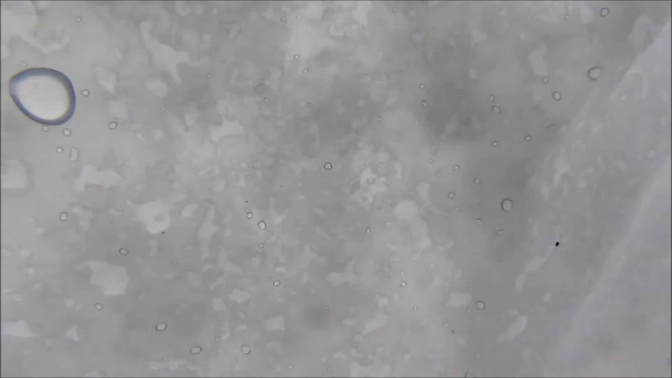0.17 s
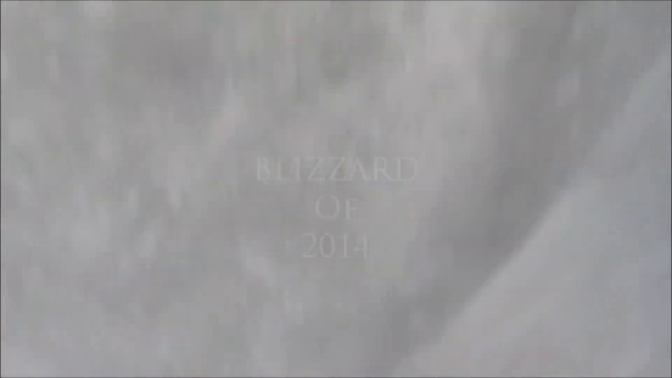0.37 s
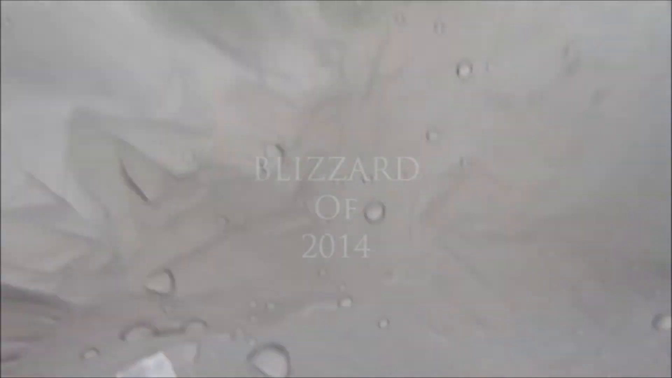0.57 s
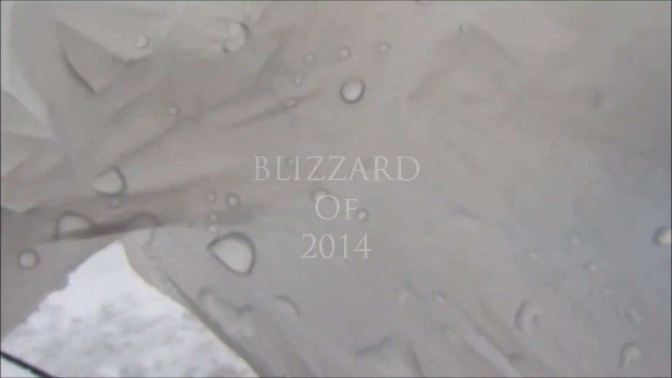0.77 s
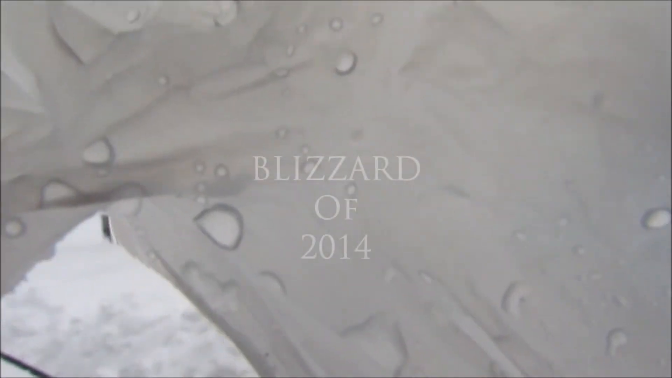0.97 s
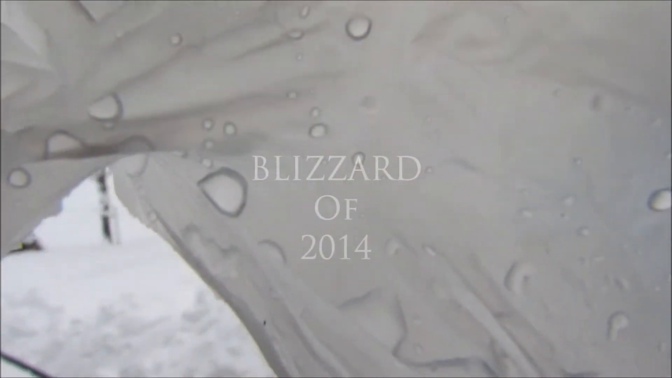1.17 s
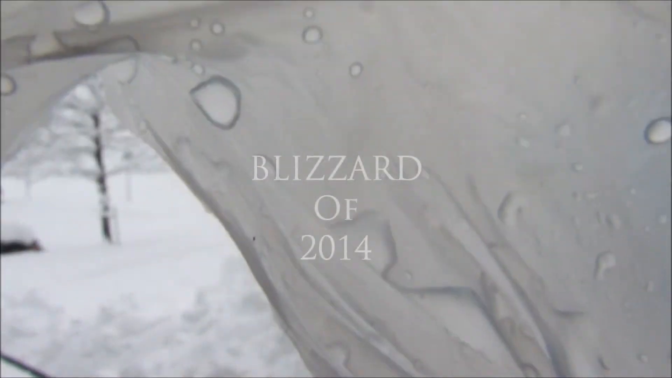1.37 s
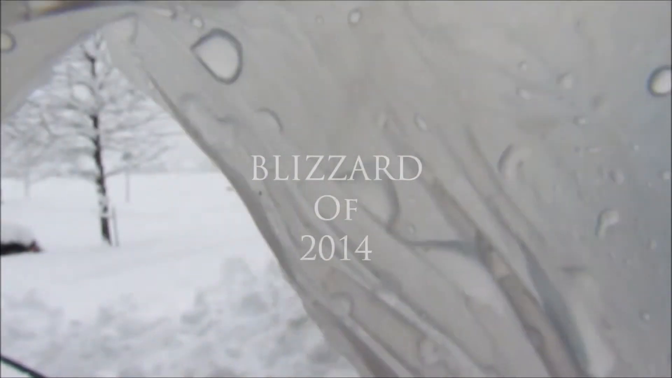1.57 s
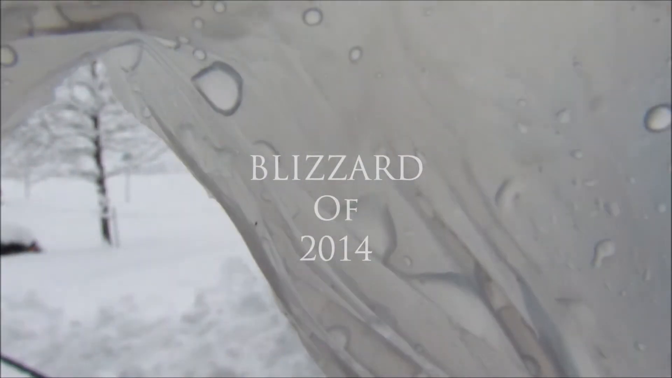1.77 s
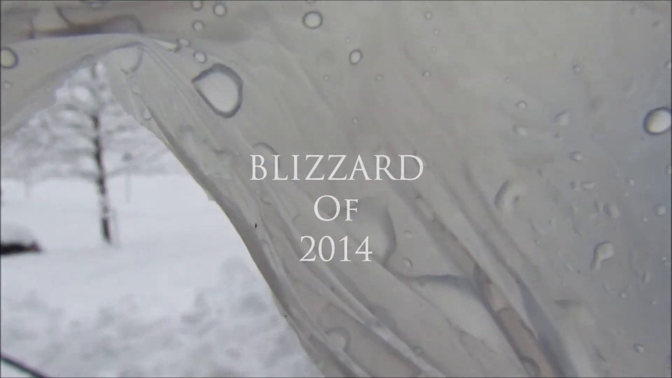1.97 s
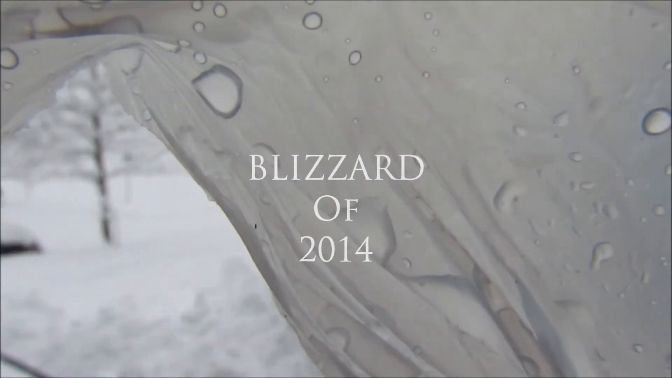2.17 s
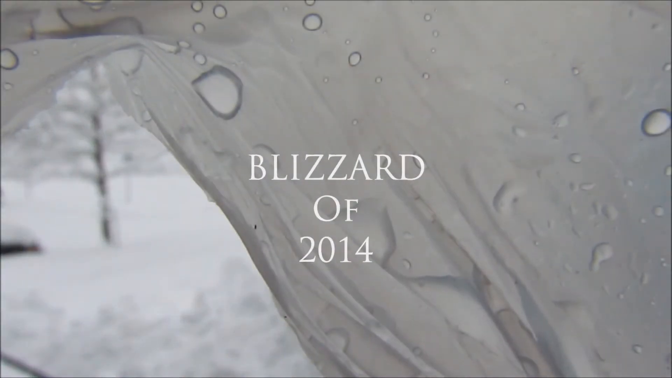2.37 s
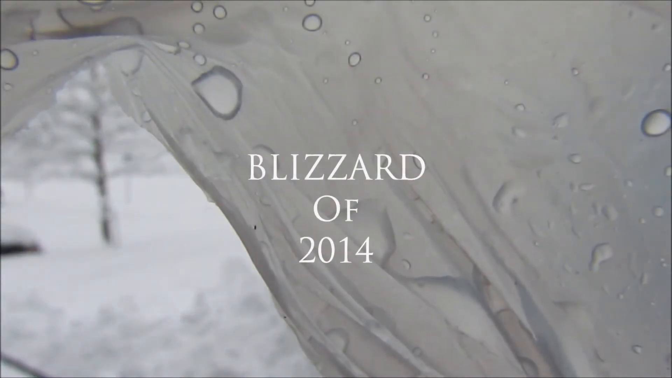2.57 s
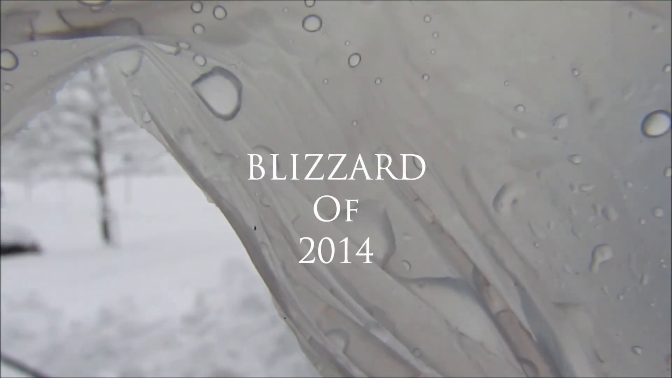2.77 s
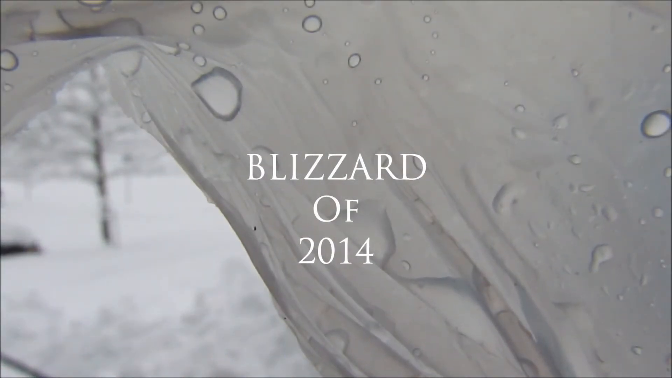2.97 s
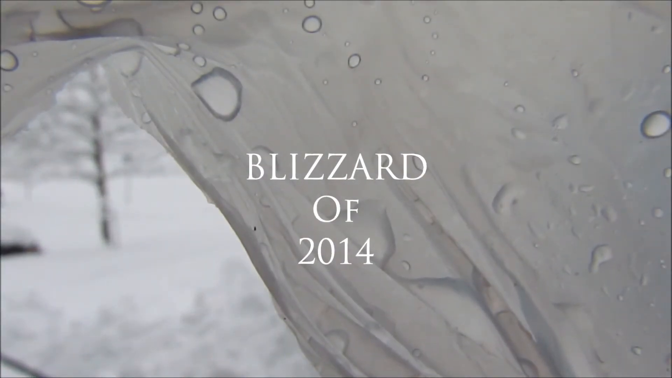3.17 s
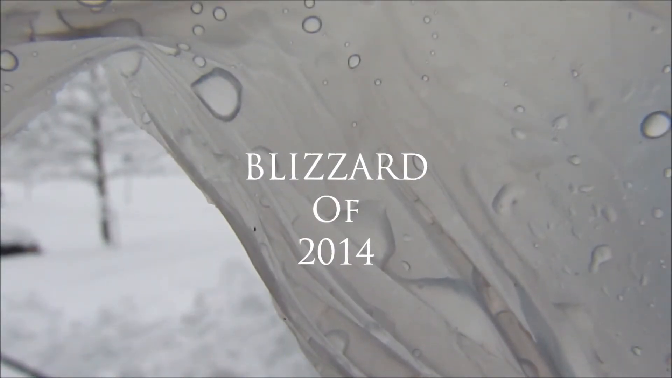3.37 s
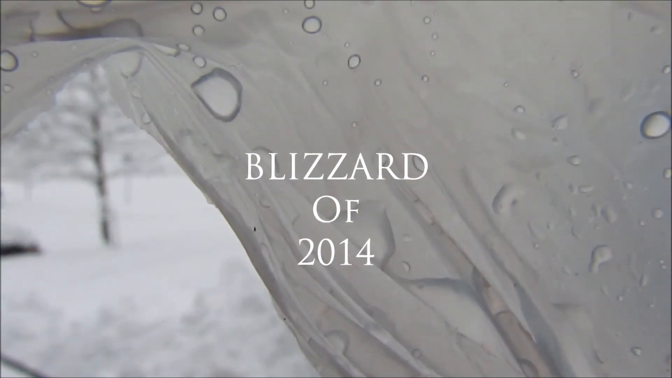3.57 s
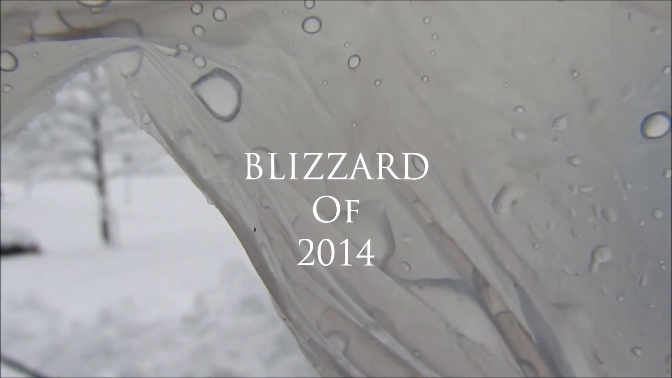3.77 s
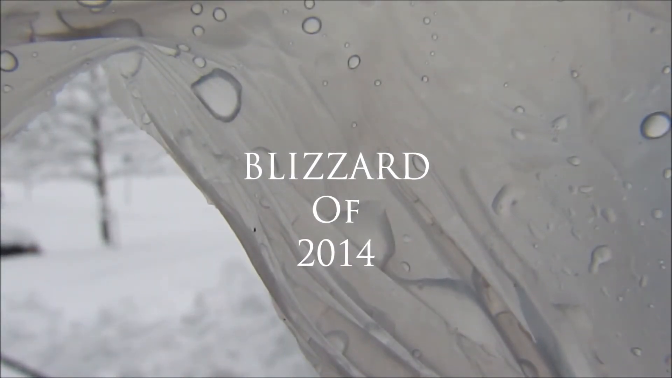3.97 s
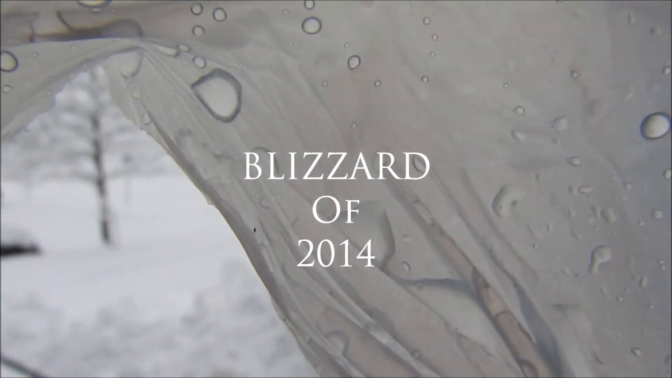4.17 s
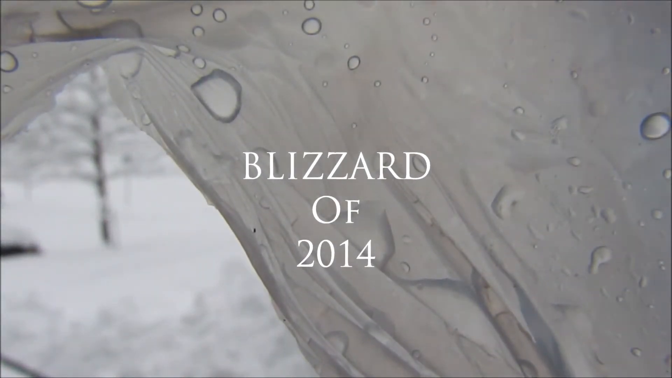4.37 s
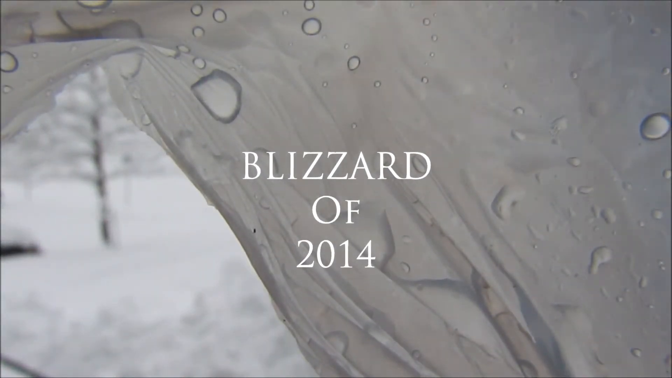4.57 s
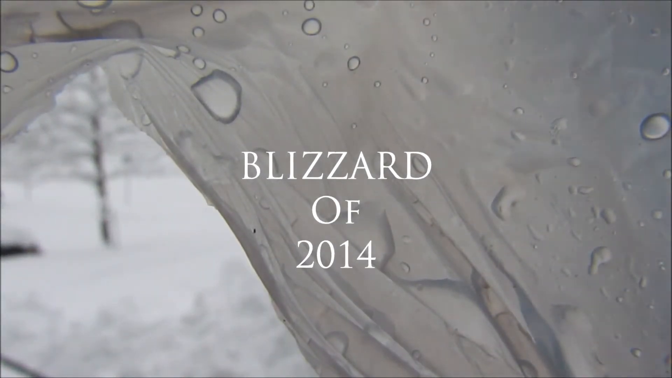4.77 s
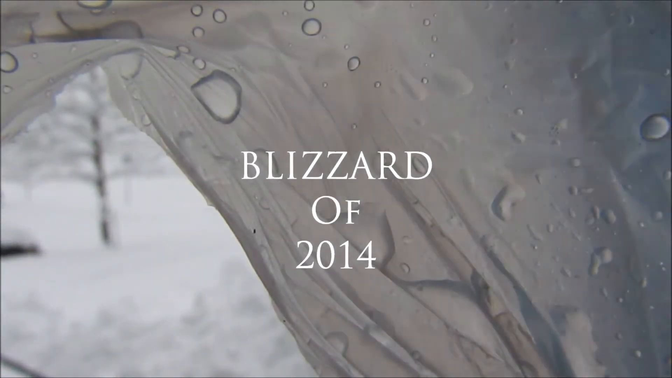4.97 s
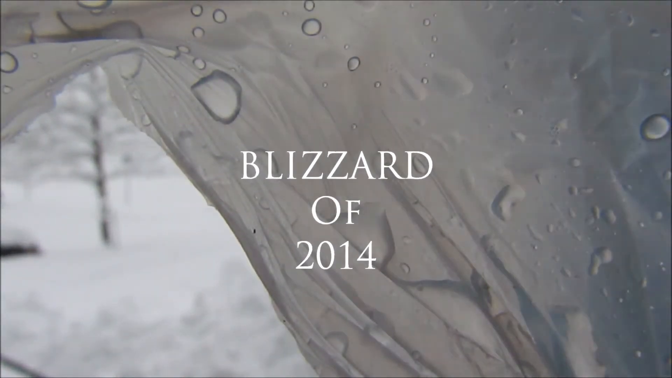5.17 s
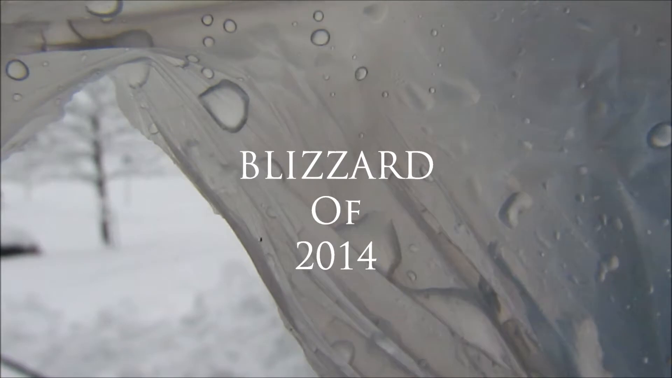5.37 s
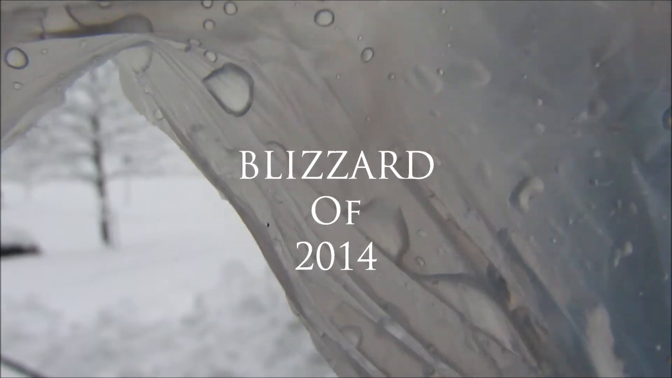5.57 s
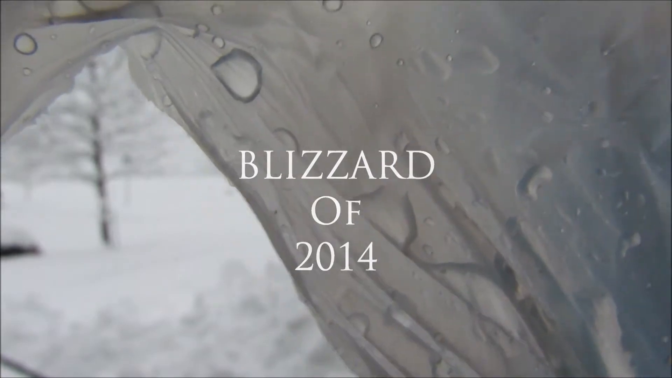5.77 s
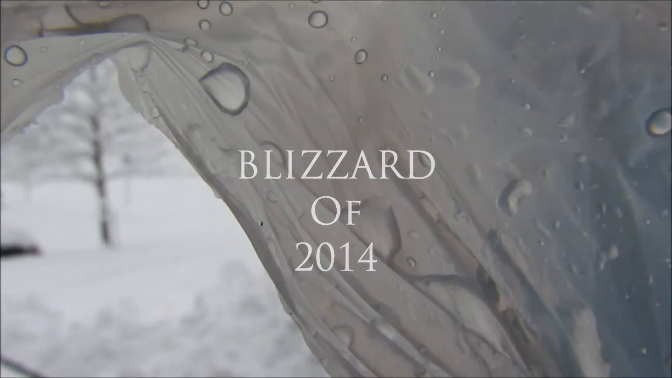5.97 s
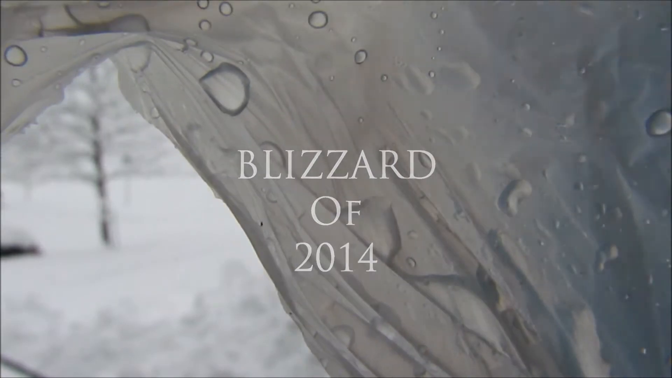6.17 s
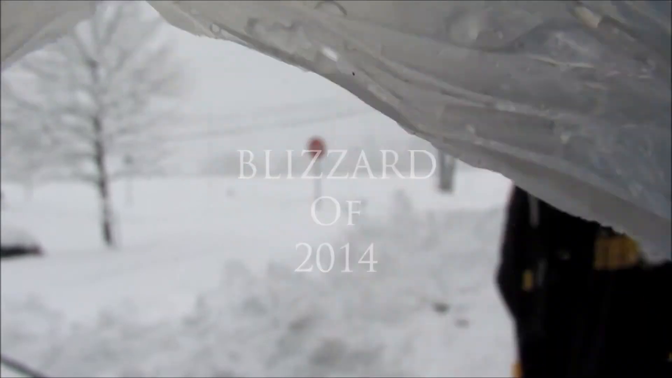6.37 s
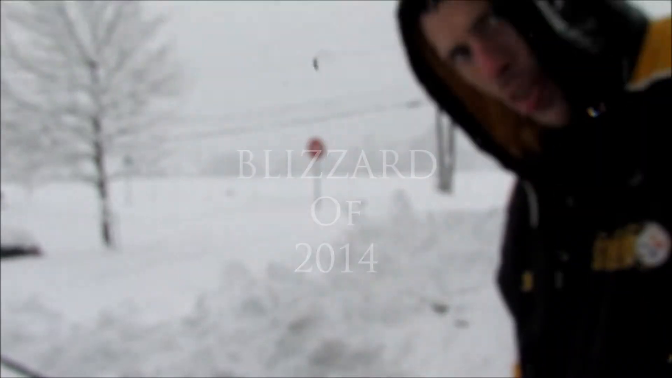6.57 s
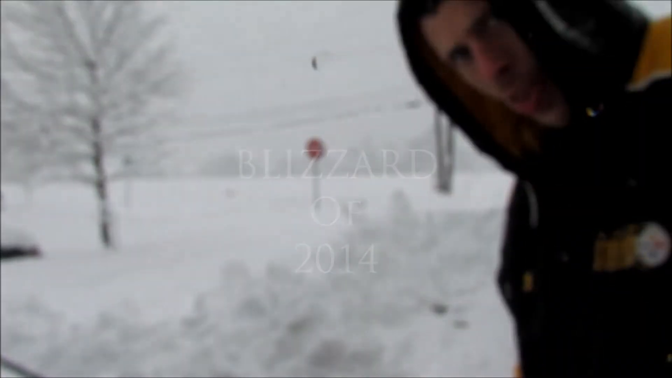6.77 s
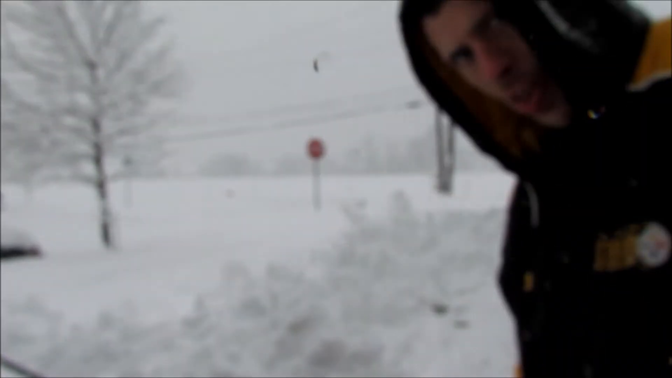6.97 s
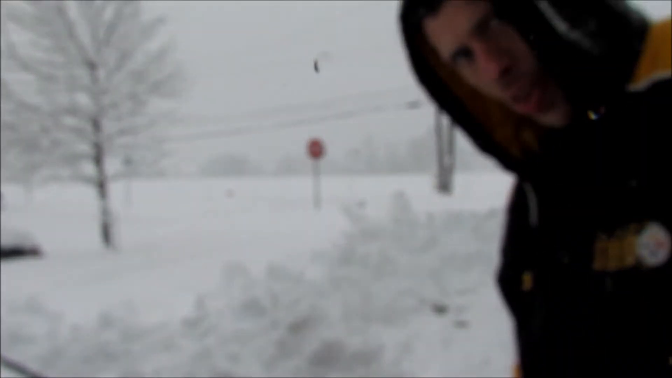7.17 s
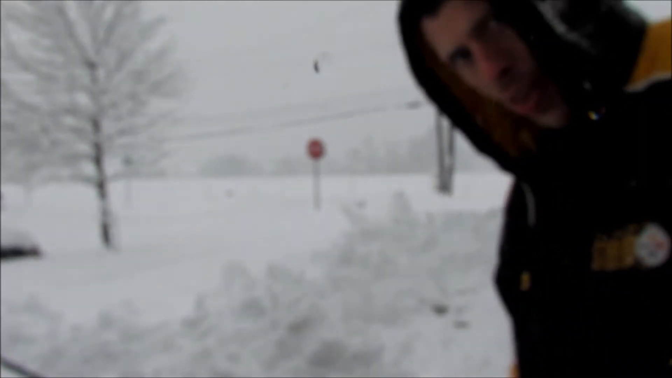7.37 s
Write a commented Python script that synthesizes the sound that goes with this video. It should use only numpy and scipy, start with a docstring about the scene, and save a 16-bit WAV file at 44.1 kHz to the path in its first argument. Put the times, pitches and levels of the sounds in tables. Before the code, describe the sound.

After a brief silence of about 0.16 s, a stiff, cold plastic sheet begins to crackle right against a small stereo microphone. From 0.25 to 1.9 s the hand tugs it repeatedly: dense showers of bright, tiny clicks over a fine rustle, low flapping pops, and sharp snaps, strongest around 0.35-0.8 s and 1.4 s. A hard snap comes at 2.03 s, then the film settles. From 2.1 to 5.3 s it is mostly quiet, with scattered ticks, small creases letting go and dull taps, notably near 3.04, 4.1-4.5 and 5.0 s, over faint steady air noise. At 5.37 s a loud snap and thump restart the handling, crackling until about 5.95 s. After a short lull, a very loud snap cluster at 6.3 s opens vigorous crinkling that continues through 7.2 s, thinning slightly before the end at about 7.4 s. Dry, outdoors, no echo.

```python
"""Outdoors, a cold, stiff plastic sheet lies over a small camera and is pulled about by hand.
Its creases buckle in dense showers of clicks, made of tiny noise bursts over a fine noise rustle.
Single loud snaps stand out as short bright bursts; the taut film flaps in low pops and taps on
the camera body in longer, lower bursts. Two microphone ports hear each crease from its own side,
and faint noise of still air lies beneath."""
import sys
import numpy as np
from scipy import signal
from scipy.fft import rfft, irfft, next_fast_len
from scipy.io import wavfile
from scipy.ndimage import uniform_filter1d, map_coordinates

SR = 44100
rng = np.random.default_rng(int(sys.argv[2]) if len(sys.argv) > 2 else 0)


def wav_record(signal):
    """Record a signal, one row per channel, as 16-bit PCM in the file named by sys.argv[1]."""
    frames = np.transpose(np.atleast_2d(signal))
    bounded = np.clip(frames, -1, 1)
    # unit amplitude maps onto the largest positive 16-bit level
    quanta = np.round(bounded * 32767).astype(np.int16)
    wavfile.write(sys.argv[1], SR, quanta)


def volts_from_db(level):
    """Convert decibel levels to linear amplitude ratios."""
    exponent = np.asarray(level, float) / 20
    return 10 ** exponent


N = 327663  # length in samples


def unit(x):
    """Scales x to rms 1."""
    return x / np.sqrt(np.mean(x ** 2) + 1e-20)


def along(points, hz):
    """Reads a curve of (Hz, value) points on a log frequency axis."""
    f, v = np.transpose(points)
    return np.interp(np.log(hz + 1), np.log(f + 1), v)


def curves(rows):
    """One value per sample for each column after the time."""
    s, *columns = np.transpose(rows)
    return [np.interp(np.arange(N) / SR, s, column) for column in columns]


def wobble(rate):
    """A smooth random curve with rate knots a second."""
    knots = rng.standard_normal(int(N * rate / SR) + 4)
    return map_coordinates(knots, [np.arange(N) * rate / SR])


def filtered(x, response):
    """Shapes the spectrum of x by a response of frequency."""
    m = next_fast_len(N + 8192)
    spectrum = rfft(x, m) * response(np.fft.rfftfreq(m, 1 / SR))
    return irfft(spectrum, m)[..., :N]


def steady(x):
    """Divides out the slow level, so that only the fast grain remains."""
    power = uniform_filter1d(np.mean(x ** 2, axis=0), SR // 10)
    return x / np.sqrt(np.abs(power) + 1e-12)


def above_rumble(hz):
    """Small patches of film radiate no deep bass."""
    return hz ** 2 / (hz ** 2 + 110 ** 2)


def sides(pan_db):
    """Left and right gains for a left-right level difference."""
    return volts_from_db(np.array([pan_db, -pan_db]) / 2)


def rush(spectrum):
    """Stereo noise of rms 1: the ports agree most in the deep bass and partly oppose in the treble."""
    # likeness of left and right: hz, correlation (-1 to 1)
    alike = [(60, 0.79), (600, 0.38), (3000, 0.56), (8000, -0.36)]

    def mid_side(hz):
        turn = np.arccos(np.clip(along(alike, hz), -1, 1)) / 2
        return volts_from_db(along(spectrum, hz)) * [np.cos(turn), np.sin(turn)]

    mid, side = filtered(rng.standard_normal((2, N)), mid_side)
    return unit(np.array([mid + side, mid - side]))


def bursts(s, db, hz, pan_db, t60, octaves, rise, lag, apart, size):
    """Dying noise bursts of given peak, each in its own band and reaching one port a little early.

    rise and lag are in seconds, size in samples; apart is the share of noise of each port's own."""
    t, f = np.arange(size) / SR, np.fft.rfftfreq(size, 1 / SR)
    shape = (1 - np.exp(-t / rise)) * volts_from_db(-60 * t / t60[:, None])
    noise = rng.standard_normal((len(s), 3, size))  # one shared, one for each port
    band = np.exp(-.5 * (np.log2((f + 1) / hz[:, None]) / octaves) ** 2)
    delay = lag * rng.standard_normal(len(s))[:, None, None] * [[.5], [-.5]]

    pair = rfft(noise[:, :1] + apart * noise[:, 1:])
    pair = pair * band[:, None] * np.exp(-2j * np.pi * f * delay)
    pair = irfft(pair, size) * shape[:, None]
    gain = volts_from_db(db - np.abs(pan_db) / 2) * sides(pan_db)  # the louder side gets the full level
    pair *= gain.T[..., None] / np.abs(pair).max(axis=(1, 2), keepdims=True)

    where = (np.round(s * SR).astype(int)[:, None] + np.arange(size)).ravel()
    return np.array([np.bincount(where, pair[:, side].ravel(), N + size)[:N] for side in range(2)])


def buckling(work_db, count, eager, spread_db):
    """Random buckles (s, dB), denser the harder the hand works.

    A positive spread gives many small and few large, largest first; a negative one the reverse."""
    when, chance = rng.random((count, 2)).T
    passed = np.cumsum(volts_from_db(eager * work_db))
    s = np.interp(when * passed[-1], passed, np.arange(N) / SR)
    level_db = -spread_db * np.log(np.sort(chance) + 0.024)
    return np.transpose([s, level_db])


def shower(buckles, hz, scatter, t60, **burst):
    """Plays buckles (s, dB) as bursts with scattered pitch, length and side."""
    pitch, length, pan = rng.standard_normal((len(buckles), 3)).T
    return bursts(*buckles.T, hz * np.exp(scatter * pitch), 3 * pan, t60 * np.exp(.5 * length), **burst)


def hand():
    """Crackle and flap levels in dB: each tug swells fast, holds and fades over the settling film."""
    # the hand's tugs: start_s, hold_s, crackle_db, flap_db
    tug_rows = [(.251, .055, -36, -40), (0.347, .105, -28, -30.5), (.457, .125, -26, -33),
                (0.613, .075, -31, -42), (.719, .137, -30, -37.5), (.914, .021, -35, -41.5),
                (1.001, .121, -40.5, -45.5), (1.133, .093, -32.5, -40), (1.199, .1, -36.5, -42),
                (1.383, .08, -32.5, -39.5), (1.508, .117, -31.5, -36.5), (1.633, .123, -39, -41),
                (1.782, .077, -40.5, -42.5), (1.97, .029, -53, -54), (2.127, .01, -52, -60),
                (2.179, .03, -61, -62), (2.279, .126, -59, -63.5), (2.568, .04, -60, -64),
                (2.679, .06, -56, -60.5), (3.042, .01, -50, -42.5), (3.135, .015, -54, -49.5),
                (3.2, .05, -53, -59), (3.285, .015, -53, -48.5), (3.888, .02, -46, -56),
                (4.052, .101, -50, -47.5), (4.607, .01, -46, -71), (4.712, .02, -51, -50.5),
                (4.907, .12, -47, -53.5), (5.27, .08, -48.5, -51), (5.374, .014, -25, -29),
                (5.432, .098, -39, -45.5), (5.585, .047, -42, -42), (5.65, .125, -27, -36),
                (5.757, .078, -31.5, -35.5), (5.864, .053, -30, -38), (5.97, .093, -47, -47.5),
                (6.187, .02, -40, -56), (6.24, .04, -52, -55), (6.306, .022, -24, -32.5),
                (6.381, .083, -31, -38.5), (6.429, .031, -28, -35), (6.496, .115, -32, -38),
                (6.623, .112, -30, -35.5), (6.739, .07, -27, -38), (6.835, .085, -29, -38.5),
                (7.032, .095, -29.5, -38.5), (7.16, .042, -26.5, -32), (7.29, .07, -43, -56),
                (7.393, .04, -37, -45)]
    # the film settling under the resting hand: time_s, crackle_db, flap_db
    rest_rows = [(.16, -45, -51.5), (1.902, -60, -61.5), (2.6, -60, -68), (3.1, -58, -60.5),
                 (3.6, -56, -65), (4.5, -54, -57), (4.901, -53, -57), (5.351, -52, -55), (6.15, -61, -66.5),
                 (7.43, -54, -47.5)]
    grip_db_per_s, usual_hold_s, abrupt = 480, .1, .6  # shorter tugs swell faster by this power
    fades_db_per_s = 340, 283  # crackle, flap

    s, hold, *tops = np.transpose(tug_rows)[..., None]
    t = np.arange(0, N, 32) / SR  # coarse time steps
    grip = grip_db_per_s * (usual_hold_s / (hold + .01)) ** abrupt
    swell = grip * np.maximum(s - t, 0)
    after = np.maximum(t - s - hold, 0)

    levels = []
    for top, fade, rest in zip(tops, fades_db_per_s, curves(rest_rows)):
        tug_power = np.sum(volts_from_db(top - swell - fade * after) ** 2, axis=0)
        tug_power = np.interp(np.arange(N) / SR, t, tug_power)
        levels.append(10 * np.log10(tug_power + volts_from_db(rest) ** 2))
    return levels


def crinkle(crackle_db, flap_db):
    """Showers of clicks over a fine rustle; the larger buckles also jolt the film into a low pop."""
    # crackle colour: hz, level_db (relative, per Hz)
    crackle_colour = [(710, -21), (1200, 0), (1740, 1.5), (4190, -3.5), (7170, -0.5), (12000, 1.5),
                      (15300, -10), (16000, -24), (16500, -67)]
    # flap colour: hz, level_db (relative, per Hz)
    flap_colour = [(15, -37), (25, -2.5), (136, 2), (257, -2), (294, -4.5), (1130, -10), (2500, -16.5),
                   (3250, -18), (5500, -120)]
    # which side the hand works on: time_s, left_right_db
    hand_side = [(0.16, -10), (0.36, 4), (0.72, -5), (2.22, 0.5), (2.69, -4), (3.01, 2.5), (3.48, -3),
                 (4.35, 0), (6.03, -6.5), (6.19, 0.5), (6.48, -6.5), (7.04, 1.5), (7.43, -7)]

    surge_db = 2.0 * wobble(28) + 2.07 * wobble(60)
    buckles = buckling(crackle_db, count=2600, eager=.25, spread_db=3.0)

    clicks = shower(buckles, hz=7500, scatter=0.67, t60=0.0049, octaves=1.24, rise=0.000067,
                    lag=.0001, apart=0.92, size=512)
    clicks = filtered(clicks, lambda hz: volts_from_db(along(crackle_colour, hz)))
    rustle = volts_from_db(-4.0) * rush(crackle_colour)
    crackle = steady(volts_from_db(surge_db) * (steady(clicks) + rustle))

    pops = shower(buckles[:1000], hz=503, scatter=0.55, t60=0.017, octaves=1.56, rise=0.00048,
                  lag=.00006, apart=0.45, size=2048)
    pops = filtered(pops, lambda hz: volts_from_db(along(flap_colour, hz)) * above_rumble(hz))
    flutter = volts_from_db(1.5) * rush(flap_colour)
    flap = steady(volts_from_db(0.84 * surge_db) * (steady(pops) + flutter))

    return sides(*curves(hand_side)) * (volts_from_db(crackle_db) * crackle + volts_from_db(flap_db) * flap)


def snaps(lesser):
    """Each crease lets go in a very short, bright click, with a longer faint fizz and duller body."""
    # creases that buckle loudly: time_s, click_peak_db (before the ports), centre_hz, left_right_db
    loud_creases = [(0.1615, -27, 8540, 1), (0.17, -22.5, 8500, 3.5), (0.183, -18.5, 8230, -9),
                    (0.2186, -15.5, 8060, -7), (0.2567, -10.5, 7160, -17), (0.6648, -10, 9300, -10),
                    (0.9351, -9, 10190, -4), (1.0047, -9, 7600, -8), (1.0532, -11.5, 10700, -7),
                    (1.138, -9, 6940, -16), (1.2306, -7, 8600, -2), (1.3468, -15.5, 9900, -2),
                    (1.3882, -6, 7800, -2), (1.4083, -2, 7860, 2), (1.4414, -0.5, 8700, -8),
                    (1.856, -4, 8300, -0.5), (1.8893, -18, 8400, -3), (1.9619, -22, 8590, 3.5),
                    (1.972, -12.5, 7950, 10), (2.026, 1, 8300, 0.5), (2.06, -29, 6290, -6),
                    (2.1307, -14.5, 5500, 0.5), (2.1365, -21, 9100, 6), (2.143, -16.5, 6650, 10),
                    (2.2165, -21.5, 8500, -10), (2.259, -23, 9400, -6), (2.3279, -25.5, 8200, 6),
                    (2.397, -21, 9500, 0), (2.4608, -23, 6740, -6.5), (2.67, -12, 9400, -6),
                    (2.7315, -10, 8700, -3.5), (2.858, -20.5, 7460, -4), (2.8944, -20, 9200, -11.5),
                    (2.9461, -21, 5300, -12), (2.9743, -25, 7200, -4), (3.0286, -20.5, 8400, -5),
                    (3.1743, -15.5, 8910, -13), (3.2167, -9, 7000, -10.5), (3.2393, -18.5, 7930, -4),
                    (3.3946, -18.5, 11000, -5), (3.519, -21.5, 7200, -7), (3.7475, -9, 9000, -2.5),
                    (3.7975, -25, 7430, 14), (3.9413, -16, 8100, -7.5), (4.1063, -20.5, 5400, -9),
                    (4.245, -26.5, 9920, -8), (4.3042, -20.5, 9400, -6), (4.3161, -15, 9800, 5),
                    (4.3499, -26, 7010, 4), (4.3598, -15, 9900, -3), (4.4143, -8, 7800, 2),
                    (4.4266, -18, 8490, 6), (4.4786, -15.5, 5600, -1), (4.5004, -18, 8520, -12),
                    (4.5169, -16.5, 7400, -7), (4.553, -21.5, 9010, -6.5), (4.6137, -22, 6160, 1),
                    (4.6437, -12.5, 9950, 5), (4.9217, -16.5, 9400, 1), (4.9973, -11, 7500, -9),
                    (5.021, -13.5, 2330, 15), (5.3346, -11, 9800, 10), (5.3686, 0.5, 8100, -7.5),
                    (5.374, -10.5, 8800, -8), (5.4448, -8, 11200, -7), (5.4943, -8, 11980, -13),
                    (5.5191, -11.5, 8220, -3), (5.5913, -14, 8400, -1.5), (5.6474, -7, 9290, -6),
                    (5.8645, -10, 9250, -8), (6.13, -31, 8000, -1), (6.21, -26, 8500, -6),
                    (6.3025, -8, 8000, 0), (6.311, 2, 8140, 2), (6.318, -3, 9000, 4),
                    (6.3277, -9, 9030, -1), (6.6462, -6.5, 7300, -7), (6.9184, -5, 7300, -0.5),
                    (7.028, -3, 7300, 3), (7.0956, -1, 9910, 1), (7.2974, -9.5, 8750, -19),
                    (7.3413, -8.5, 10100, -10), (7.4114, -14.5, 8410, -8.5)]
    # treble loss of the microphone ports: hz, gain_db
    port_loss = [(13000, -1), (15000, -7), (16000, -17), (17000, -45)]

    s, db, hz, pan_db = np.vstack([loud_creases, lesser]).T
    t60 = 0.002 * np.exp(0.37 * rng.standard_normal(len(s)))
    click = bursts(s, db, hz, pan_db, t60, octaves=0.87, rise=.00005,
                   lag=.00003, apart=0.47, size=1024)
    fizz = bursts(s, db - 9.0, hz, pan_db, 4 * t60, octaves=0.3, rise=0.00017,
                  lag=.0001, apart=0.67, size=1024)
    body = bursts(s, db - 18.5, hz / 5, pan_db, 3 * t60, octaves=1.75, rise=0.00073,
                  lag=.00004, apart=0.67, size=1024)
    return filtered(click + fizz + body, lambda hz: volts_from_db(along(port_loss, hz)))


def strays(crackle_db):
    """Lesser snaps at random moments, mostly while the hand works hard: s, peak dB, Hz, left-right dB."""
    s, size_db = buckling(crackle_db, count=60, eager=0.33, spread_db=-0.5).T
    pitch, pan = rng.standard_normal((len(s), 2)).T
    level_db = crackle_db[(s * SR).astype(int)] + size_db + 9  # the largest lie 9 dB over the crackle
    return np.transpose([s, level_db, 8600 * np.exp(.12 * pitch), 7 * pan])


def taps():
    """Each tap jolts the taut film briefly; the high part dies first and the low part rings on."""
    # the film taps the camera body: time_s, peak_db (high part, before the bass loss), centre_hz
    body_taps = [(0.1838, -31, 474), (0.2696, -27, 305), (0.363, -24.5, 506), (0.409, -15.5, 356),
                 (0.4603, -23, 413), (1.0904, -23, 244), (1.2112, -22, 440), (1.441, -18.5, 1160),
                 (2.0261, -41, 965), (2.064, -39.5, 200), (2.218, -41.5, 706), (2.274, -36, 710),
                 (2.328, -36, 790), (2.3954, -35.5, 700), (2.4625, -39.5, 1000), (2.676, -41.5, 220),
                 (2.7316, -27.5, 354), (2.895, -36.5, 1610), (3.0428, -17, 910), (3.134, -22.5, 860),
                 (3.282, -26, 865), (3.2842, -20, 630), (3.7471, -31, 740), (3.888, -39.5, 170),
                 (4.054, -36, 348), (4.1, -23.5, 674), (4.1903, -32, 760), (4.2909, -24, 450),
                 (4.3009, -22.5, 423), (4.476, -26, 1180), (4.554, -21, 497), (4.611, -35, 1330),
                 (4.9966, -19.5, 520), (5.019, -14.5, 790), (5.229, -33.5, 1080), (5.37, -17, 300),
                 (5.379, -11.5, 410), (5.4678, -22, 1190), (5.7724, -20.5, 754), (5.926, -21, 550),
                 (6.1854, -32, 650), (6.335, -21.5, 550), (6.4567, -26.5, 417), (6.8958, -18.5, 470),
                 (7.0409, -22.5, 516), (7.0889, -17.5, 416), (7.1704, -20.5, 600), (7.3255, -31, 675)]
    s, db, hz = np.transpose(body_taps)
    t60 = 0.046 * (600 / hz) ** 0.12  # 46 ms at 600 Hz, less for higher taps
    pan_db = np.full(len(s), -1.5)
    high = bursts(s, db, 1.116 * hz, pan_db, 0.53 * t60, octaves=0.93, rise=0.00058,
                  lag=.00004, apart=0.71, size=4096)
    low = bursts(s, db - 8.0, 0.5 * hz, pan_db, 1.3 * t60, octaves=0.75, rise=0.00085,
                 lag=.00004, apart=0.26, size=4096)
    return filtered(high + low, above_rumble)


def still_air():
    """Faint steady noise of still air and the film at rest, strongest below the treble."""
    # colour of the air: hz, level_db (relative, per Hz)
    air_colour = [(15, -29), (25, 4), (568, -5), (1600, 7.5), (3810, -4), (11600, -26), (15200, -10),
                  (16500, -35)]
    return volts_from_db(-67.0) * rush(air_colour)


def scene():
    """The hand drives the crinkling sheet, its snaps and taps, in still air."""
    crackle_db, flap_db = hand()
    sheet = crinkle(crackle_db, flap_db) + snaps(strays(crackle_db))
    return sheet + taps() + still_air()


def band_limit(x):
    """A steep low-pass at the top of the band."""
    return signal.sosfilt(signal.butter(12, 16990, fs=SR, output="sos"), x)


def record(dry):
    """Soft saturation of the loudest peaks, a band limit and silence before the start."""
    start_s, top_hz, ceiling = 0.16, 16800, .65
    soft = dry / (1 + np.abs(dry / ceiling) ** 4) ** (1 / 4)
    limited = filtered(soft, lambda hz: hz < top_hz)
    mix = limited * (np.arange(N) > start_s * SR)
    return band_limit(mix)


dry = scene()
out = record(dry)
wav_record(out)
```